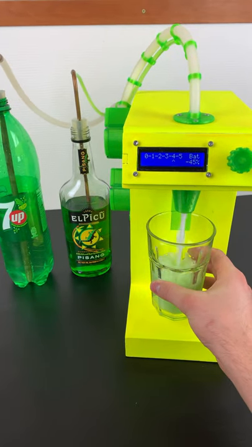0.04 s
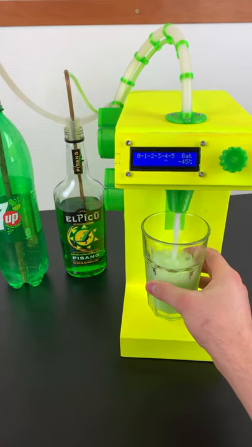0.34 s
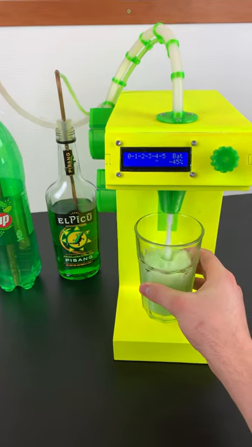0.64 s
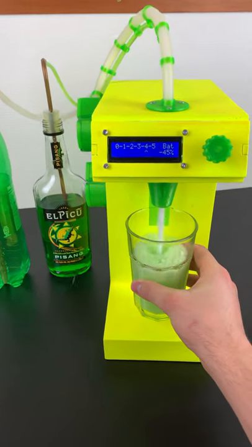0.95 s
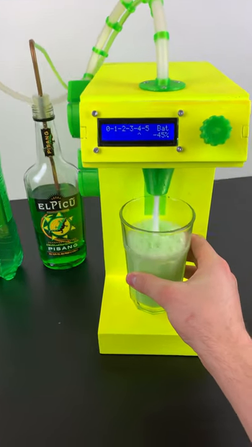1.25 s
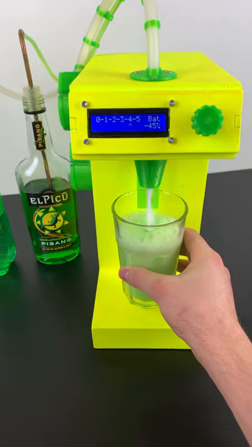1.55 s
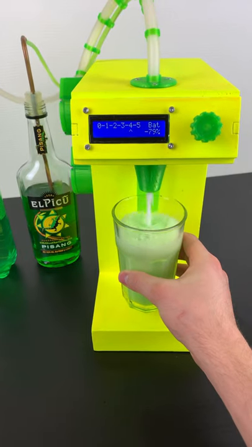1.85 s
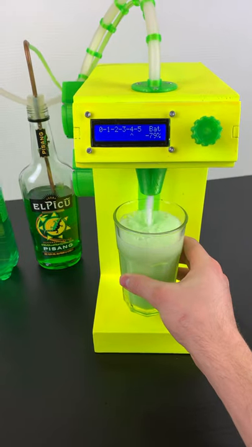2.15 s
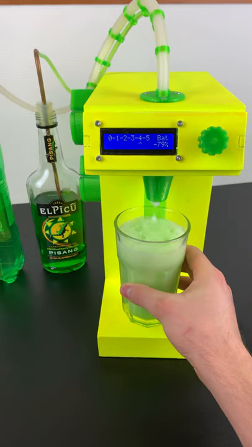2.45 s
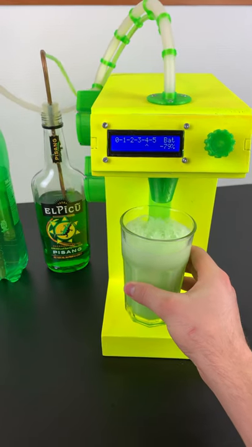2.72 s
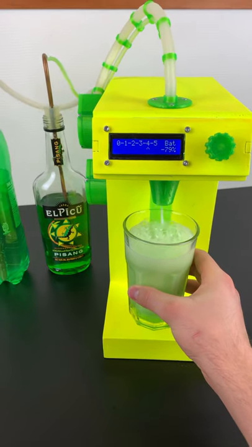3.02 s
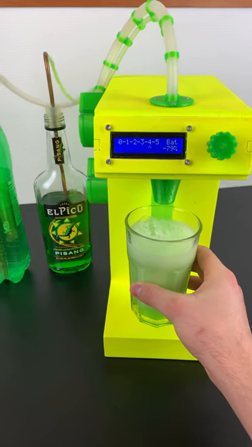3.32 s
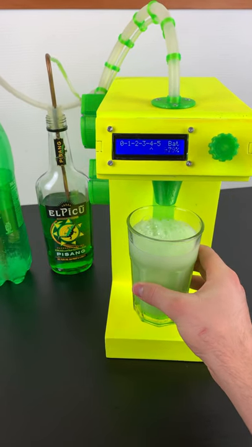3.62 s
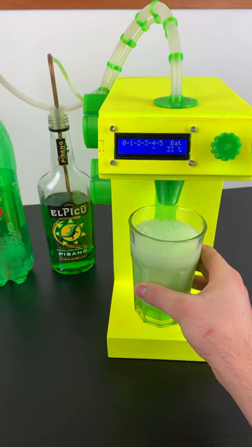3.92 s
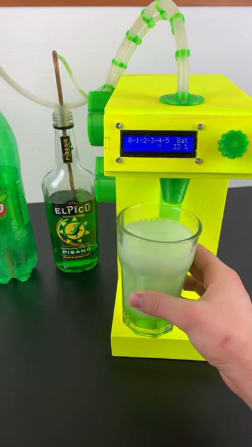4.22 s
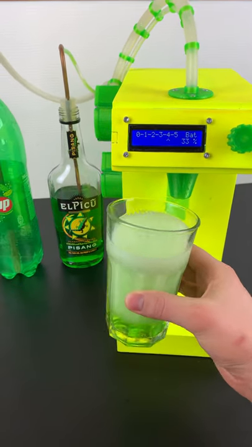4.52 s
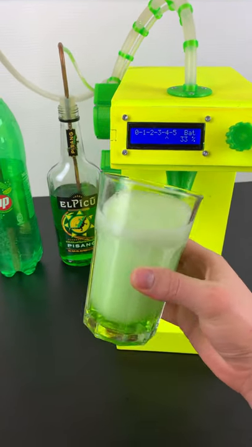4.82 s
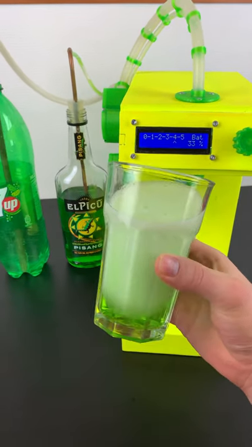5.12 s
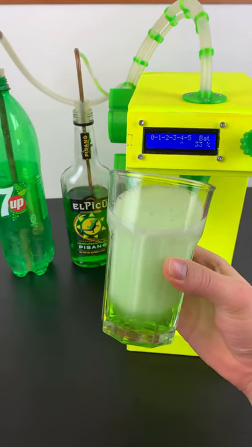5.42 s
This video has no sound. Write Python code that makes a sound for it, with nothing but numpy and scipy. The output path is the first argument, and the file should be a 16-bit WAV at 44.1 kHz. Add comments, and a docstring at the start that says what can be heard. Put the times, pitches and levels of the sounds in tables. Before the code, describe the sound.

A drink dispenser's two pumps run noisily one after the other and stop, leaving faintly fizzing foam and a glass knocking against the plastic housing.

```python
"""First comes the whirr and hum of a roller pump, as a home-made drink dispenser fills a glass.
Its gears rattle and whine, its squeezed tube hums, and the jet rings in the glass. Then a smaller
pump rasps briefly. Bursting bubbles make the foam fizz faintly. The glass bumps the hollow plastic
housing as it is lifted out, and the hand shifts on it. A small, lively room, in mono from close by."""
import sys
import numpy as np
from scipy import signal
from scipy.fft import rfft, irfft, next_fast_len
from scipy.io import wavfile

SR = 44100
rng = np.random.default_rng(int(sys.argv[2]) if len(sys.argv) > 2 else 0)


def output_pcm(signal):
    """Save a mono or channel-first signal as 16-bit PCM at the path in sys.argv[1].

    Samples are clipped to [-1, 1] before scaling.
    """
    pcm = np.clip(np.atleast_2d(signal).T, -1, 1) * 32767
    wavfile.write(sys.argv[1], SR, np.round(pcm).astype(np.int16))


N = 249606
TIME = np.arange(N) / SR


def from_db(db):
    """Turn decibels into a number to multiply by."""
    return 10 ** (np.asarray(db) / 20)


def rms_one(x):
    """Scale a sound so that its average power is 1."""
    return x / np.sqrt(np.mean(x ** 2) + 1e-20)


def in_time(rows):
    """Join a table's moments with straight lines; gives one curve for each column after the time."""
    times, *columns = np.transpose(rows)
    return [np.interp(TIME, times, column) for column in columns]


def at_hz(points, hz):
    """Look up a pitch in a table, with every octave equally wide."""
    known, values = np.transpose(points)
    return np.interp(np.log(hz + 1e-3), np.log(known), values)


def noise():
    """A plain, even hiss."""
    return rng.standard_normal(N)


def drift(per_s):
    """A random wander of about 1 either way, turning per_s times a second."""
    knots = rng.standard_normal(2000)
    return rms_one(np.interp(TIME * per_s, np.arange(len(knots)), knots))


def rising(start, rise):
    """Silent until the start, then settling at 1."""
    return 1 - np.exp(-np.maximum(TIME - start, 0) / rise)


def running(start, stop, rise, fall):
    """Rise towards 1, then die away after the stop, like a motor braked by friction."""
    return rising(start, rise) * np.exp(-np.maximum(TIME - stop, 0) / fall)


def swell(centre, width):
    """A smooth rise to 1 and fall again."""
    return np.exp(-((TIME - centre) / width) ** 2)


def struck(start, decay):
    """A sudden jump to 1 that dies away."""
    return (TIME >= start) * np.exp(-np.abs(TIME - start) / decay)


def tone(hz, waver_hz, rough, flutter_per_s=280):
    """One note whose pitch wavers and whose strength flutters."""
    strength = 1 + rough * drift(flutter_per_s)
    cycles = np.cumsum(hz + waver_hz * drift(60)) / SR + rng.random()
    return rms_one(strength * np.sin(2 * np.pi * cycles))


def butter(x, hz, kind, order=2):
    """Keep the low part, the high part or one band of a sound."""
    sections = signal.butter(order, np.clip(hz, 10, .45 * SR), kind, fs=SR, output="sos")
    return signal.sosfilt(sections, x + 1e-18)


def coloured(x, colour, rings=(), gaps=()):
    """Give a sound a colour (its balance of bass and treble), plus narrow peaks and gaps; power 1."""
    size = next_fast_len(N)
    f = np.arange(size // 2 + 1) * SR / size
    peaks = sum(from_db(db) ** 2 / (1 + (2 * (f - hz) / width) ** 2) for hz, width, db in rings)
    kept = np.prod([1 - lost / (1 + (2 * (f - hz) / width) ** 2) for hz, width, lost in gaps], axis=0)
    gain = from_db(at_hz(colour, f)) * np.sqrt(kept * (1 + peaks))
    return rms_one(irfft(rfft(x, size) * gain, size)[:N])


def gear_clicks(passes, per_s, turn_depth, roller_depth, uneven_db):
    """Loose teeth chatter; the load swells with each of three rollers and once per full turn."""
    clicks = (rng.random(N) < per_s / SR) * noise()
    load = 1 + turn_depth * np.cos(2 * np.pi * passes / 3) + roller_depth * np.cos(2 * np.pi * passes)
    return clicks * load * from_db(uneven_db * drift(120))


def at_effort(rattle, effort):
    """Slower gears strike more softly, so the treble comes last and goes first."""
    dull = butter(rattle, 1640, "low", order=1)
    return effort * (dull + effort * (rattle - dull))


# colour of the big pump's gears: f/Hz, level/dB
BIG_GEAR_COLOUR = [(42, -49), (72, -14), (125, 5.5), (210, -1), (300, 2), (450, -1), (700, -0.5),
                   (1100, -2.5), (2300, -2), (3750, -1.1), (5300, -1.46), (7400, -7), (9300, -5),
                   (11500, -7), (13800, -13.5)]
# pitches at which its casing rings: f/Hz, width/Hz, level/dB relative to the colour
BIG_CASING_RINGS = [(145, 16, 7), (178, 12, 2), (409, 12, 5), (491, 12, 4), (675, 36, 7), (779, 14, 5),
                    (828, 14, 5.5), (952, 20, 7), (1459, 26, 5.5), (1563, 22, 6), (1815, 24, 2.5),
                    (2013, 22, 4.5), (2433, 36, 2), (2780, 100, 1.5), (3400, 220, -2), (4790, 150, -2),
                    (5150, 200, -5), (9050, 120, -1), (9370, 160, -1), (11690, 200, 7)]
# how its rattle grows louder and softer: t/s, level/dB
BIG_RATTLE_CHANGE = [(0, 0), (1.22, 0), (1.33, 0.5), (1.45, 0), (2.2, -0.14), (2.3, -1.5)]


def big_pump():
    """Gears rattle in the casing as rollers squeeze a tube and shake the housing; gives (bright, bass)."""
    passes_per_s = 48.8 - 6.4 * np.clip(TIME - 1.94, 0, 1)   # the rollers slow shortly before the stop
    passes = np.cumsum(passes_per_s * (1 + 0.0069 * drift(24.8))) / SR
    clicks = gear_clicks(passes, per_s=26000, turn_depth=0.047, roller_depth=0.086, uneven_db=0.48)
    effort = running(start=-0.025, stop=2.304, rise=0.0082, fall=0.047)
    rattle_db = -26 + in_time(BIG_RATTLE_CHANGE)[0]
    rattle = from_db(rattle_db) * coloured(clicks, BIG_GEAR_COLOUR, BIG_CASING_RINGS)
    strain = effort ** 3 * (gear_whine() + casing_groan() + panel_buzz())
    return at_effort(rattle + strain, effort), effort * tube_hum(passes) + housing_drone(effort)


# the notes in the hum: multiple of the roller rate, level/dB
HUM_NOTES = [(1, -22), (2, -3.5), (3, -14), (5, -13)]
# how the hum changes: t/s, level/dB, depth of its throb from 0 to 1
HUM_COURSE = [(0, -32.5, 1), (.22, -32.5, 0.54), (.44, -29, 0.16), (.65, -32, 0.9), (1.06, -38.5, 0.9),
              (1.24, -32, 0.4), (1.38, -33.5, 0.7), (1.48, -36, 0.8), (1.66, -35.5, .6), (1.85, -28, 0),
              (2.08, -34, 0.5), (2.22, -36.5, 0.3), (2.3, -43, .3)]
THROB_ANGLE = 2 * np.pi * 4.88 * (TIME - 0.034)   # 4.88 dips a second, the first at 0.034 s


def tube_hum(passes):
    """Each passing roller squeezes the tube, making a low hum that throbs."""
    hum = sum(from_db(db) * np.sin(2 * np.pi * (k * passes + rng.random())) for k, db in HUM_NOTES)
    level_db, depth = in_time(HUM_COURSE)
    return hum * from_db(level_db) * np.abs(1 - depth * np.exp(1j * THROB_ANGLE))


# the notes of the hollow housing on the table: f/Hz, level/dB, time to fade by 60 dB t/s
HOUSING_NOTES = [(73.5, -20, 0.77), (98.8, -9, 0.21), (120.5, -0.5, 0.45), (137.7, -11, 0.41),
                 (176, -5.5, 0.36), (238.8, -5.5, 0.19), (371.7, -15.5, 0.19), (396, -16, 0.14),
                 (484, -22, 0.23), (557, -24.5, 0.218), (715, -10.5, 0.21), (906, -25, 0.16),
                 (950, -24, 0.15), (1610, -39, 0.15)]


def housing(force):
    """Any push sets all the notes of the hollow plastic ringing, each fading at its own pace."""
    out = np.zeros(N)
    for hz, db, fade_s in HOUSING_NOTES:
        keep = np.exp(-np.log(1000) / (fade_s * SR))   # what is left after one sample
        step = 2 * np.pi * hz / SR
        feedback = [1, -2 * keep * np.cos(step), keep * keep]
        out += from_db(db) * signal.lfilter([0, np.sin(step)], feedback, force + 1e-18)
    return out


# the notes of the housing's drone: f/Hz, level/dB, swing/dB at the deepest throb
DRONE_NOTES = [(120.7, -42, 5), (139.6, -48.5, 8), (178.5, -49, 7.5), (239.9, -47, 2)]


def housing_drone(effort):
    """The shaken housing rumbles, and drones harder in each dip of the hum."""
    throb = in_time(HUM_COURSE)[1] * np.cos(THROB_ANGLE)
    drone = sum(from_db(db + swing_db * throb) * tone(hz, waver_hz=2.34, rough=0.53, flutter_per_s=25)
                for hz, db, swing_db in DRONE_NOTES)
    rumble = from_db(-46.5) * rms_one(housing(butter(noise(), 115, "high") * effort))
    # as the pump winds down, the housing's main note swells and rings out
    wind_down = from_db(-29.5) * running(start=2.245, stop=2.345, rise=0.036, fall=0.081)
    main_note = np.sin(2 * np.pi * 121 * TIME)
    return effort * drone * rising(start=-.15, rise=0.33) + rumble + wind_down * main_note


# colour of the room's air: f/Hz, level/dB
AIR_COLOUR = [(25, -10), (60, 5), (120, -0.5), (200, -1.5), (320, -5), (550, -8), (850, -5), (1150, -5),
              (1500, -4), (2200, -8.5), (3500, -20)]
# its one faint ring: f/Hz, width/Hz, level/dB relative to the colour
AIR_RING = [(1540, 210, 0)]


def room_air():
    """The air in the room makes a faint, low rush."""
    return from_db(-70) * coloured(noise(), AIR_COLOUR, AIR_RING)


def bubble_pops(per_s=7700):
    """Countless tiny bubbles of different sizes burst at random moments."""
    pops = (rng.random(N) < per_s / SR) * noise()
    size_db = -np.minimum(rng.exponential(1, N), 4)
    flicker_db = 0.7 * drift(30)
    return pops * from_db(size_db + flicker_db)


# colour of the foam's fizz: f/Hz, level/dB
FIZZ_COLOUR = [(1500, -31), (2400, 0), (3100, -2.5), (3700, 0.5), (4100, 1), (6100, 0), (6900, -3.5),
               (7800, -4.5), (8300, -11.5), (11500, -21), (15500, -20.5)]
# pitches at which the top of the glass rings: f/Hz, width/Hz, level/dB relative to the colour
GLASS_TOP_RINGS = [(3300, 300, 3), (4600, 200, -3)]


def foam_fizz():
    """Bursting bubbles fizz steadily and ring in the top of the glass."""
    return from_db(-70) * coloured(bubble_pops(), FIZZ_COLOUR, GLASS_TOP_RINGS)


# the clear rings that the jet sets off: t/s, f/Hz, level/dB
JET_RINGS = [(.085, 3345, -39), (.205, 3360, -35), (.365, 3730, -36), (.385, 3650, -36),
             (.525, 3775, -38.5), (.53, 3345, -40), (.6, 3850, -38.5), (.705, 3730, -38)]


def pour(faint_count=40, until_s=0.98, half_length_s=0.022):
    """The jet strikes the liquid: a few clear rings among faint ones, until foam covers it."""
    faint = [(until_s * rng.random(), rng.normal(3726, 270), -41.5) for _ in range(faint_count)]
    rings = sum(from_db(db) * swell(s, half_length_s) * np.sin(2 * np.pi * hz * (TIME - s))
                for s, hz, db in JET_RINGS + faint)
    churn = rms_one(1 + .8 * drift(220))   # the churning liquid roughens each ring
    return np.sqrt(2) * rings * churn


# moments when the loose panels buzz: t/s, level/dB
PANEL_BUZZES = [(.18, -43.5), (.61, -42.5), (.9, -39.5), (1.025, -44), (1.33, -42), (1.46, -44.5),
                (1.55, -47), (2.105, -39)]


def panel_buzz(pitches_hz=(1450, 1569)):
    """Two loose panels of the big pump's casing buzz together in short bursts."""
    bursts = sum(from_db(db) * swell(s, width=.042) for s, db in PANEL_BUZZES)
    return bursts * sum(tone(hz, waver_hz=18, rough=0.71) for hz in pitches_hz)


# spurts of the whine, some a little flat: t/s, f/Hz, level/dB, half-length/s
GEAR_SPURTS = [(1.125, 3472, -43, 0.045), (1.378, 3400, -44.5, 0.038), (1.575, 3460, -36, .04),
               (1.67, 3320, -37, .03), (1.803, 3520, -39.5, 0.063), (1.93, 3510, -36, 0.046),
               (2.03, 3320, -38.5, 0.038), (2.15, 3466, -38.5, 0.044)]


def gear_whine():
    """The gears whine on one rough note that sets in under load and swells in spurts."""
    strength = from_db(-40.5 + 2 * drift(35)) * rising(start=0.78, rise=.14)
    steady = strength * tone(hz=3470, waver_hz=15, rough=.8)
    return steady + sum(from_db(db) * swell(s, width) * tone(hz, waver_hz=9, rough=0.65)
                        for s, hz, db, width in GEAR_SPURTS)


def casing_groan():
    """The casing groans as the big pump slows."""
    return from_db(-37) * swell(centre=2.19, width=0.17) * rms_one(butter(noise(), (600, 670), "band"))


# colour of the small pump's gears: f/Hz, level/dB
SMALL_GEAR_COLOUR = [(48, -17), (72, 4), (110, 1.5), (200, -7), (340, -3.5), (520, 1.5), (900, 2),
                     (1400, -1.5), (2250, -2), (2700, -4.5), (3700, -1.5), (5300, -5), (7500, -9.5),
                     (9000, -7), (12000, -9.5), (13700, -19)]
# pitches at which its casing rings: f/Hz, width/Hz, level/dB relative to the colour
SMALL_CASING_RINGS = [(245, 20, 5), (490, 14, 5), (710, 16, 0), (776, 16, 4), (964, 14, 6), (1090, 30, -1),
                      (1295, 30, 1), (1653, 50, 5), (1830, 50, 2), (2420, 90, -2), (3160, 70, 2),
                      (3480, 75, 4), (4800, 100, -1), (5330, 90, -2), (6380, 60, 1), (8770, 300, -1),
                      (9600, 160, -1), (10400, 60, 1), (11700, 130, 5), (12020, 150, 2), (13200, 90, 4)]
# pitches that its echo off the table cancels: f/Hz, width/Hz, share of power lost from 0 to 1
TABLE_ECHO_GAPS = [(1530, 110, .7), (2230, 110, .8), (4060, 90, .55), (11130, 200, .55)]
# how its rattle grows louder and softer: t/s, level/dB
SMALL_RATTLE_CHANGE = [(2.9, 0), (3.1, .8), (3.21, 0), (3.28, 1.2), (3.35, -0.5)]


def small_pump():
    """A lighter pump's gears rasp more coarsely and barely shake the housing; gives (bright, bass)."""
    passes = np.cumsum(47 * (1 + 0.023 * drift(9.6))) / SR   # about 47 roller passes a second
    clicks = gear_clicks(passes, per_s=24000, turn_depth=0.074, roller_depth=0.057, uneven_db=0.8)
    effort = running(start=2.4875, stop=3.354, rise=.012, fall=.028)
    rattle_db = -31.5 + in_time(SMALL_RATTLE_CHANGE)[0]
    rasp = coloured(clicks, SMALL_GEAR_COLOUR, SMALL_CASING_RINGS, TABLE_ECHO_GAPS)
    rattle = at_effort(from_db(rattle_db) * rasp, effort)
    # the motor jerks against its mount as it starts
    clunk = rms_one(butter(clicks, [470, 720], "band"))
    jerk = from_db(-36) * running(start=2.491, stop=2.5, rise=0.004, fall=0.01) * clunk
    drone = from_db(-53.5) * rms_one(housing(butter(noise(), 123, "high") * effort))
    return rattle + jerk, drone + shaft_wobble()


def shaft_wobble(hz=118.4):
    """The small pump's off-balance shaft hums unsteadily and coasts on until friction halts it."""
    coasting = np.clip((3.57 - TIME) / 0.23, 0, 1) ** 1.5
    hum = np.sin(2 * np.pi * np.cumsum(hz * (1 + 0.077 * drift(50))) / SR)
    return from_db(-45 + 3.2 * drift(40)) * rising(start=2.489, rise=0.018) * coasting * hum


# the narrow bands in which the settling foam sizzles: f/Hz, width/Hz, level/dB
SIZZLE_BANDS = [(3100, 300, 1), (4600, 260, -3.5)]


def foam_sizzle():
    """After the pour, bursting bubbles sizzle briefly as the foam settles."""
    pops = bubble_pops()
    sizzle = sum(from_db(db) * rms_one(butter(pops, [hz - width / 2, hz + width / 2], "band", order=1))
                 for hz, width, db in SIZZLE_BANDS)
    return from_db(-75) * running(start=3.64, stop=3.88, rise=0.055, fall=0.26) * sizzle


# the glass hits the housing: t/s, thud level/dB, clack level/dB, brightness f/Hz, clack length/s
GLASS_KNOCKS = [(4.166, -34, -43, 3000, .008), (4.1753, -31.5, -41.5, 1100, .01),
                (4.1829, -25.5, -45, 2000, .006), (4.1943, -35.5, -45, 900, .009),
                (4.2124, -33.5, -46, 700, 0.0074), (4.2324, -31.5, -53, 355, .011)]
# colour of the plastic's clack: f/Hz, level/dB
PLASTIC_COLOUR = [(560, -4), (700, 1), (950, -5), (1150, -11), (1750, -9), (2300, -21), (3250, -10),
                  (3800, -22), (8000, -21), (12000, -45)]
# colour of the rim's one crisp tick: f/Hz, level/dB
RIM_COLOUR = [(1000, -15), (2500, -10), (5000, 4), (7800, -7), (8600, -23), (15000, -28)]


def glass_bumps(boom_rise_s=0.005):
    """The glass stutters on the housing: plastic clacks and booms, the rim ticks; gives (bright, bass)."""
    force, clack = np.zeros(N), np.zeros(N)
    plastic = coloured(noise(), PLASTIC_COLOUR)
    for s, thud_db, clack_db, bright_hz, length in GLASS_KNOCKS:
        tap = 1.0 * (np.arange(N) == round(s * SR))
        force += from_db(thud_db) * butter(tap, bright_hz, "low")
        dulled = rms_one(butter(plastic, bright_hz, "low", order=1))
        clack += from_db(clack_db) * dulled * struck(s, length)
    tick = from_db(-43) * struck(start=4.1813, decay=.0024) * coloured(noise(), RIM_COLOUR)
    boom = housing(1.0 * (TIME == 0)) * rising(0, boom_rise_s)   # the housing's answer to one tap
    return clack + tick, signal.fftconvolve(force, boom[:SR])[:N]


# fingers shift on the glass: t/s, level/dB, length/s
FINGER_SLIPS = [(4.692, -58.5, 0.029), (5.346, -59, 0.029), (5.539, -67, .012)]
# colour of skin rubbing glass: f/Hz, level/dB
RUB_COLOUR = [(50, -6.5), (120, 8), (250, -14), (600, 1), (1000, -4), (1370, 6.5), (1800, -17), (4000, -12),
              (9000, -31)]


def fingers():
    """Skin slips on the glass in brief, dull rubs."""
    pressure = sum(from_db(db) * running(start=s, stop=s + 0.0073, rise=0.0012, fall=length)
                   for s, db, length in FINGER_SLIPS)
    return pressure * coloured(noise(), RUB_COLOUR)


def arm_rustle():
    """The arm rustles softly as it draws the glass closer."""
    rustle = butter(coloured(noise(), AIR_COLOUR), [130, 3500], "band")
    return from_db(-67) * swell(centre=5.42, width=0.37) * rustle


# how long the room echoes at each pitch: f/Hz, time to fade by 60 dB t/s
ECHO_FADE = [(250, 0.5), (700, 0.27), (1800, 0.28), (4800, 0.21), (13000, .18)]


def wall_echoes():
    """The walls answer a click with a crowd of echoes, the treble dying first."""
    t, tail = TIME[:SR // 2], 0
    edges_hz = np.geomspace(200, 18000, 7)
    for low, high in zip(edges_hz, edges_hz[1:]):
        fade_s = at_hz(ECHO_FADE, np.sqrt(low * high))
        band = butter(rng.standard_normal(len(t)), [low, high], "band")
        tail = tail + band * np.exp(-np.log(1000) * t / fade_s) / np.sqrt(fade_s)
    tail = tail * np.clip(t / 0.0011, 0, 1)   # even the nearest walls take a moment to answer
    return tail / np.sqrt(np.sum(tail ** 2))


def room(x, echo_db, patterns=10):
    """A sound plus its room echoes, blended from several shifting patterns to sound smooth and even."""
    blend = np.array([drift(20) for _ in range(patterns)])
    blend = blend / np.sqrt(np.sum(blend ** 2, axis=0))
    echoes = sum(share * signal.oaconvolve(x, wall_echoes())[:N] for share in blend)
    return (x + from_db(echo_db) * echoes) / np.sqrt(1 + from_db(echo_db) ** 2)


def scene():
    """Bright sounds scatter round the room; the bass comes straight from housing and table."""
    bright, bass = np.sum([big_pump(), small_pump(), glass_bumps()], axis=0)
    echoing = room(bright + pour() + fingers(), echo_db=-5.5)
    hush = from_db(-4 * (1 - rising(start=3.7, rise=0.28)))   # lifts just after the pumps stop
    background = hush * (room_air() + foam_fizz())
    mono = echoing + bass + background + foam_sizzle() + arm_rustle()
    return np.array([mono, mono])


def record(dry):
    """The microphone sheds the deepest bass; the highest treble is cut steeply."""
    bass_cut_hz, top_cut_hz = 50, 15600
    top_cut = signal.ellip(12, .1, 90, top_cut_hz, fs=SR, output="sos")
    return signal.sosfilt(top_cut, butter(dry, bass_cut_hz, "high", order=4))


dry = scene()
out = record(dry)
output_pcm(out)
```